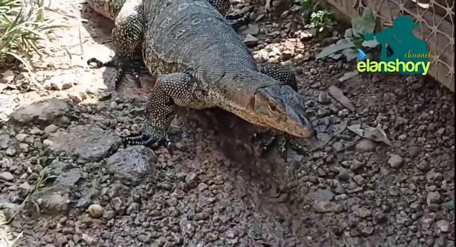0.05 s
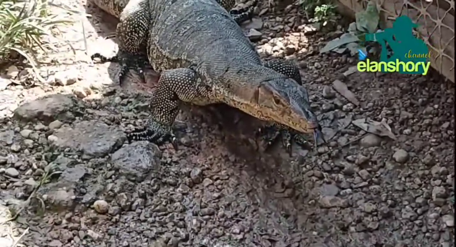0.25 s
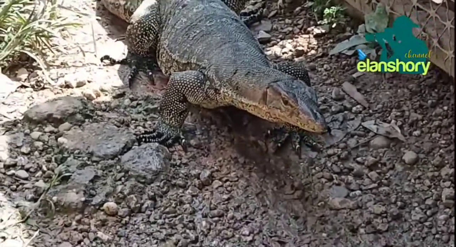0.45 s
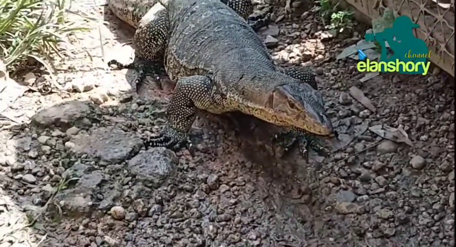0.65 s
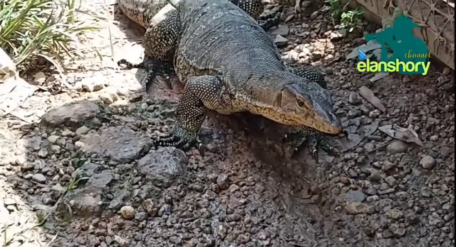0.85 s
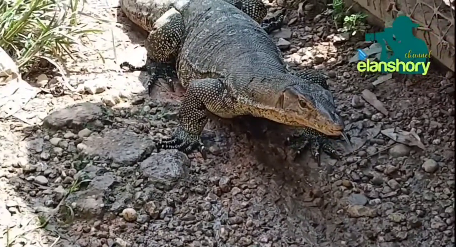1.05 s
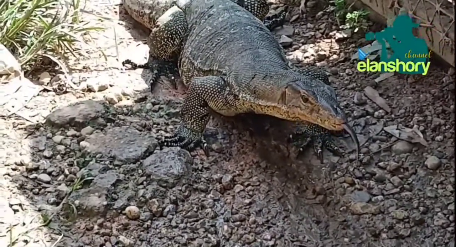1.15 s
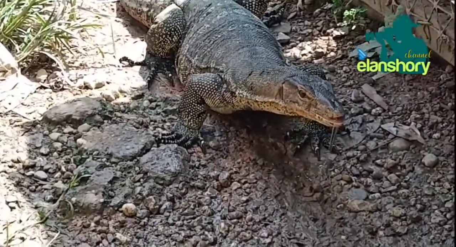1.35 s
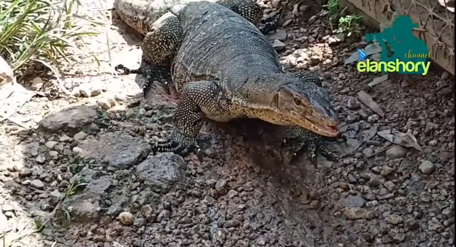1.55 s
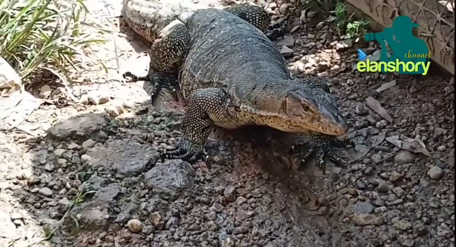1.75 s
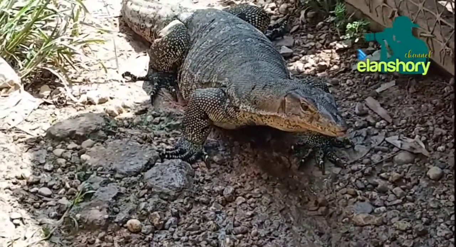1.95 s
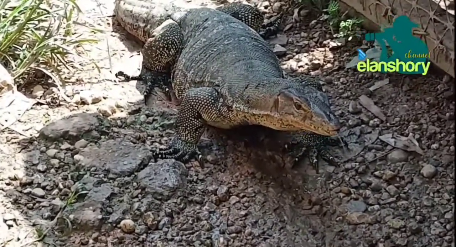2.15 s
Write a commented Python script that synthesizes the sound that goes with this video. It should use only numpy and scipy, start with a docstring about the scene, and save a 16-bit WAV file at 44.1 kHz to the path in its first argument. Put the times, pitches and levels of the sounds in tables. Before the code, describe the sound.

A steady hiss of splashing water, with a hollow thump, soft knocks and low rumble.

```python
"""Outdoors, water patters down: an even hiss of spray, with drops that pat and tick as short
bursts of band-passed noise. Nearby, one loud thump and a few faint knocks ring the modes of a
hollow body, each blurred by close echoes. A low drone swells underneath."""
import sys
import numpy as np
from scipy import signal
from scipy.fft import rfft, irfft
from scipy.io import wavfile

SR = 44100
rng = np.random.default_rng(int(sys.argv[2]) if len(sys.argv) > 2 else 0)


def master_out(mix):
    """Clip the mix to full scale and print it as 16-bit PCM to the path in sys.argv[1]."""
    frames = np.transpose(np.atleast_2d(mix))
    ceiling = np.clip(frames, -1, 1)
    pcm = np.round(ceiling * 32767).astype(np.int16)
    wavfile.write(sys.argv[1], SR, pcm)


N = 97020

# Spectrum of splashing water. Each row: frequency in Hz, relative density in dB.
SPRAY_SPECTRUM = [(200, -20), (380, -14.5), (520, -10), (600, 5), (700, -5), (1000, -4), (1400, 2),
                  (2100, 5), (2700, -1.5), (3300, -12.5), (4400, 2), (5600, -6.5), (7400, 5.5), (8700, -1),
                  (10500, -16), (13500, -10.5), (16000, -14.5)]


def patter():
    """Small drops fall at random on 48 spots, each with its own pitch, splash and echoes."""
    drops_per_s, spread_db = 520, 4.5
    lead, pitches_hz = SR // 4, np.geomspace(700, 15000, 48)
    size = N + lead
    lands = rng.random(size) < drops_per_s / SR
    size_db = spread_db * np.minimum(rng.exponential(1, size), 2.5)
    impacts = lands * from_db(size_db) * rng.choice([-1, 1], size)
    spot = rng.integers(0, len(pitches_hz), size)
    shape = drop_shape(np.arange(lead) / SR, tail_db=-9)
    out = 0
    for k, hz in enumerate(pitches_hz):
        ring = drop_ring(shape, hz, octaves=.28 * (.5 + rng.random()))
        splash = from_db(-3.5) * drop_ring(shape, 2 * hz, octaves=4.2)
        hits = signal.fftconvolve(impacts * (spot == k), ring + splash)[lead:size]
        out += hits * from_db(at_hz(SPRAY_SPECTRUM, hz)) * np.sqrt(hz)
    return from_db(-37) * rms_one(out)


def drops():
    """Single drops: each splashes broadly and rings in its own band."""
    # Each row: start in seconds, relative level in dB, pitch in Hz, width in octaves.
    impacts = [(0.046, -33, 6900, 0.89), (0.189, -24, 2220, 0.37), (0.191, -26.5, 1244, 0.25),
               (0.208, -31.5, 7340, 0.35), (0.485, -30, 6850, 0.46), (0.508, -25, 1915, 0.2),
               (0.569, -31, 1700, 0.28), (0.582, -33.5, 626, 0.18), (0.587, -29, 7400, 0.74),
               (0.637, -25.5, 1216, 0.38), (0.640, -21.5, 1730, 0.25), (0.778, -27.5, 1190, 0.84),
               (0.813, -25.5, 2820, 0.48), (0.8142, -25.5, 5800, 1.1), (0.859, -29.5, 1940, 0.41),
               (1.003, -30, 7140, 0.6), (1.1182, -23.5, 1890, 0.38), (1.164, -28, 1480, 0.48),
               (1.191, -28, 6200, 1.05), (1.204, -20, 1398, 0.2), (1.234, -28.5, 1420, 0.24),
               (1.242, -25.5, 5300, 1.6), (1.262, -30, 1400, 0.15), (1.305, -33.5, 2440, 0.25),
               (1.418, -32, 2420, 0.24), (1.446, -28.5, 4460, 0.21), (1.53, -34, 5500, 3),
               (1.533, -30, 1265, 0.16), (1.5808, -25.5, 6900, 0.24), (1.709, -20, 1730, 0.43),
               (1.746, -29.5, 5370, 1.3), (1.745, -27.5, 1740, 0.31), (1.842, -31.5, 1180, 1.6),
               (1.86, -28.5, 4830, 1.8), (1.901, -29, 2040, 0.52), (1.904, -28, 4380, 0.24),
               (1.944, -31, 1170, 0.72), (1.946, -28, 8000, 0.4), (2.04, -35.5, 2600, 1.3),
               (2.073, -29, 7400, 0.86), (2.173, -24.5, 7440, 0.5)]
    out = np.zeros(N + SR)
    shape = drop_shape(np.arange(SR // 4) / SR, tail_db=-10)
    splash_noise = np.tile(coloured(SPRAY_SPECTRUM), 2)
    for start_s, db, hz, octaves in impacts:
        start = int(start_s * SR)
        span = slice(start, start + len(shape))
        ring = from_db(-6.5) * drop_ring(shape, hz, octaves)
        splash = from_db(-20) * splash_noise[span] * shape
        out[span] += from_db(db) * (ring + splash)
    return out[:N]


def drop_shape(t, tail_db):
    """Drop envelope: direct snap, cluster of close echoes, tail; summed in power."""
    direct = from_db(6) * burst(t, .0002, .001, t60_s=.02)
    cluster = burst(t, .0005, .01, t60_s=.025)
    tail = from_db(tail_db) * burst(t, .008, .01, t60_s=.26)
    return np.sqrt(direct ** 2 + cluster ** 2 + tail ** 2)


def drop_ring(shape, hz, octaves):
    """A burst of gritty noise rings in one band, at the rms of its envelope."""
    white, jitter = rng.standard_normal((2, len(shape)))
    grit = white * np.exp(.6 * np.clip(jitter, -2, 2))
    return rms_one(band(grit * shape, hz, octaves)) * np.sqrt(np.mean(shape ** 2))


def thump():
    """A short crack and a low thud; the hollow body rings among dense echoes with a faint tail."""
    # Spectra of crack and echoes. Each row: frequency in Hz, relative density in dB.
    crack_spectrum = [(190, 8), (400, -7), (600, 8.5), (1500, 1), (2300, -2.5), (3500, -18), (7200, -13),
                      (16000, -21.5)]
    echo_spectrum = [(170, -14.5), (340, -14), (500, -3.5), (640, -8.5), (770, -10.5), (1080, -17),
                     (2350, -20.5), (3500, -34.5), (7200, -31.5), (16000, -44)]
    t = since(.3235)
    crack = from_db(-11.5) * coloured(crack_spectrum) * burst(since(.3225), .003, .013, t60_s=.04)
    close = burst(t, .0035, .068, t60_s=.2)
    tail = from_db(-19) * burst(t, .021, .17, t60_s=.62)
    echoes = from_db(-16) * coloured(echo_spectrum) * np.hypot(close, tail)
    return crack + from_db(-11) * thud(t, hz=211) + echoes + body_ring(t)


def knocks():
    """Faint, low-passed knocks on the same body, each with a low thud and a weak tail."""
    # Each row: start in seconds, relative level in dB, low-pass corner in Hz, thud level in dB.
    blows = [(0.01, -23, 2570, -50), (0.753, -11, 350, -35.5), (0.833, -22, 1500, -44),
             (1.2, -14, 2080, -26), (1.557, -26.5, 880, -36.5), (1.682, -19.5, 2970, -28.5),
             (2.085, -26, 1700, -50)]
    # Impact noise. Each row: frequency in Hz, relative density in dB.
    knock_spectrum = [(190, -3.5), (370, -14.5), (600, -3.5), (900, -1.5), (1300, -3.5), (2400, -3),
                      (3500, -10), (16000, -37)]
    thud_lag_s = .0143
    noise = from_db(-12.5) * coloured(knock_spectrum)
    out = 0
    for start_s, db, corner_hz, thud_db in blows:
        t = since(start_s)
        close = burst(t, .002, .023, t60_s=.16)
        tail = from_db(-13) * burst(t, .018, .03, t60_s=.3)
        blow = noise * np.hypot(close, tail) + from_db(-14) * body_ring(t)
        lowpass = signal.butter(2, corner_hz, fs=SR, output="sos")
        out += from_db(db) * signal.sosfilt(lowpass, blow)
        out += from_db(thud_db) * thud(t - thud_lag_s, hz=183.4)
    return out


def body_ring(t):
    """Decaying modes of the hollow body after a blow."""
    # Each row: frequency in Hz, level in dB, T60 in seconds.
    modes = [(260, -23.5, 0.35), (282.3, -23.5, 0.27), (358, -23, .2), (490, -20.5, .28), (527, -29, .3),
             (712, -29, .29), (742, -21, .24), (821, -21, 0.14), (1700, -29, 0.34)]
    return sum(from_db(db) * tone(t, hz) * burst(t, .012, .028, t60_s) for hz, db, t60_s in modes)


def thud(t, hz):
    """The weight of a blow: a few low cycles."""
    return np.sin(2 * np.pi * hz * t) * burst(t, .0042, .0049, t60_s=.095)


def spray():
    """Fine spray: a steady hiss."""
    return from_db(-39) * coloured(SPRAY_SPECTRUM)


def drone():
    """Low resonances rumble steadily; brief tones at their pitches swell at uneven moments."""
    # Each row: frequency in Hz, width in Hz, steady level in dB, swell offset in dB.
    resonances = [(75.8, 53, -44, -2), (110.2, 37, -42, -0.5), (148, 122, -49, -13)]
    # Each row: crest in seconds, Gaussian sigma in seconds, upper resonances in dB, lowest in dB.
    swells = [(0.1, 0.021, -28, -33.5), (0.207, 0.028, -27.5, -30.5), (0.421, 0.021, -25.5, -32),
              (0.528, 0.034, -25.5, -32), (0.661, 0.019, -49, -33.5), (.765, 0.029, -26, -31),
              (0.852, 0.027, -29.5, -36), (0.999, 0.021, -35, -29), (1.203, 0.032, -26.5, -40),
              (1.441, 0.015, -32, -32), (1.561, .009, -29, -27), (1.608, 0.041, -31, -39),
              (1.778, 0.015, -24.5, -30.5), (1.856, 0.025, -27.5, -45), (1.899, 0.012, -24, -24.5),
              (2.113, 0.011, -24.5, -41)]
    out, bins_hz = 0, np.arange(N // 2 + 1) * SR / N
    for k, (hz, width_hz, steady_db, offset_db) in enumerate(resonances):
        detune = 2 * (bins_hz - hz) / width_hz
        rumble = irfft(rfft(rng.standard_normal(N)) / (1 + detune ** 2) ** 2, N)
        out += from_db(steady_db) * rms_one(rumble)
        for crest_s, sigma_s, upper_db, lowest_db in swells:
            t = since(crest_s)
            crest_db = offset_db + (upper_db if k else lowest_db)
            out += from_db(crest_db) * np.exp(-.5 * (t / sigma_s) ** 2) * tone(t, hz)
    return out


def from_db(db):
    """Decibels to gain."""
    return 10 ** (np.asarray(db) / 20)


def rms_one(x):
    """Scale to rms 1."""
    return x / np.sqrt(np.mean(x ** 2) + 1e-20)


def at_hz(spectrum, hz):
    """Level in dB, interpolated over log frequency."""
    points_hz, db = np.transpose(spectrum)
    return np.interp(np.log(np.maximum(hz, 1)), np.log(points_hz), db)


def since(start_s):
    """Time axis in seconds, zero at start_s."""
    return np.arange(N) / SR - start_s


def tone(t, hz):
    """Sine of random phase."""
    return np.sin(2 * np.pi * (hz * t + rng.random()))


def band(x, hz, octaves):
    """Band-pass around hz, at most 3 octaves wide."""
    edge_ratio = 2 ** (np.clip(octaves, .1, 3) / 2)
    high_hz = min(hz * edge_ratio, .48 * SR)
    low_hz = min(hz, high_hz) / edge_ratio
    return signal.sosfilt(signal.butter(2, [low_hz, high_hz], "band", fs=SR, output="sos"), x)


def coloured(spectrum):
    """Noise of a given spectrum, falling steeply below its first point; rms 1."""
    hz = np.arange(N // 2 + 1) * SR / N
    skirt = np.minimum(hz / spectrum[0][0], 1) ** 7
    return rms_one(irfft(rfft(rng.standard_normal(N)) * from_db(at_hz(spectrum, hz)) * skirt, N))


def burst(t, attack_s, hold_s, t60_s):
    """Envelope: linear attack, exponential release from t = hold_s."""
    return np.clip(t / attack_s, 0, 1) * from_db(-60 * np.maximum(t - hold_s, 0) / t60_s)


def scene():
    """Water, blows and drone in mono."""
    water = spray() + patter() + drops()
    return (water + thump() + knocks() + drone())[None]


def record(dry):
    """Soft clip, then a steep low-pass."""
    cutoff_hz = 15800
    lowpass = signal.ellip(12, .1, 90, cutoff_hz, fs=SR, output="sos")
    return signal.sosfilt(lowpass, 1.13 * np.tanh(dry / 1.251))


dry = scene()
out = record(dry)
master_out(out)
```